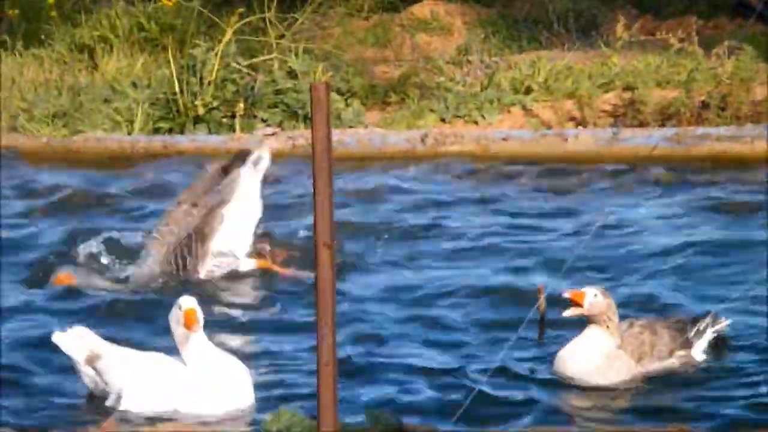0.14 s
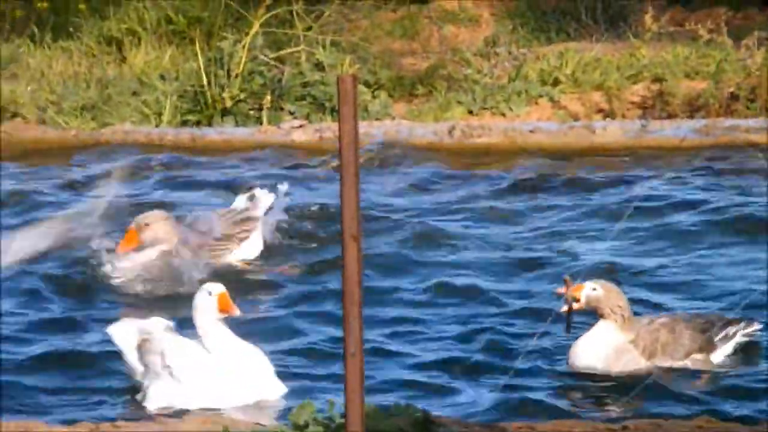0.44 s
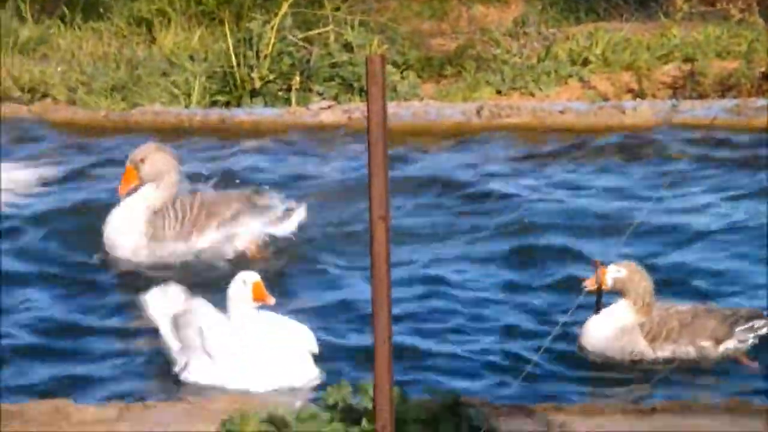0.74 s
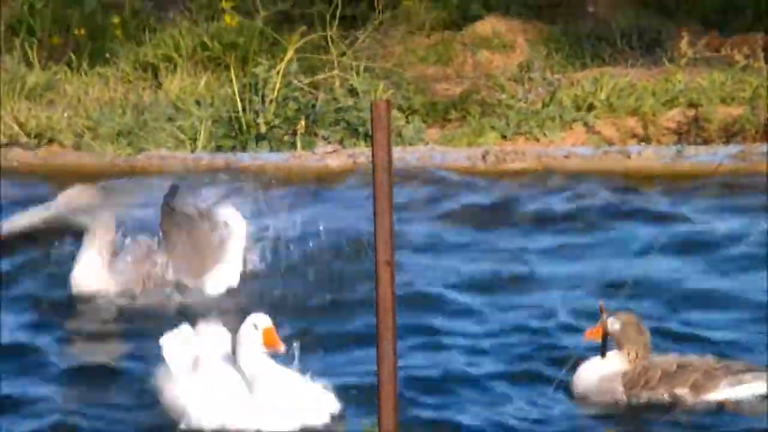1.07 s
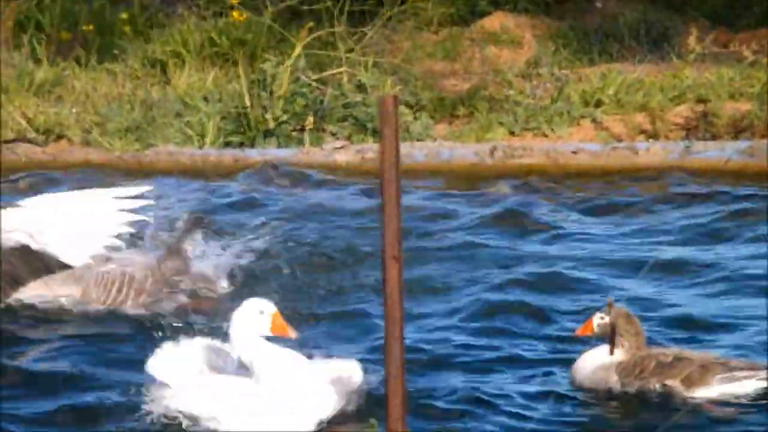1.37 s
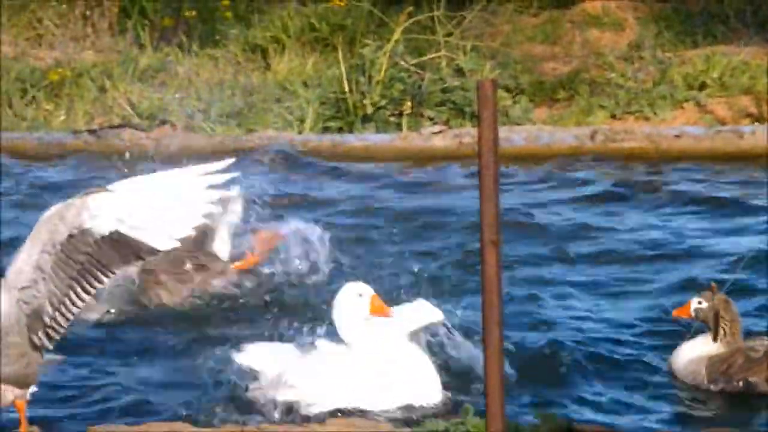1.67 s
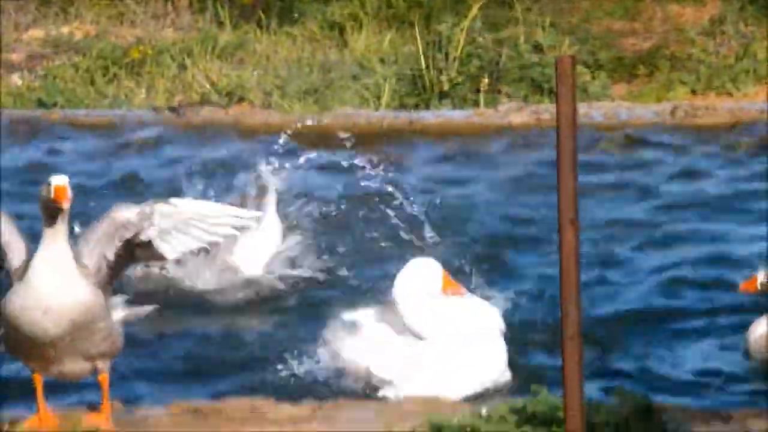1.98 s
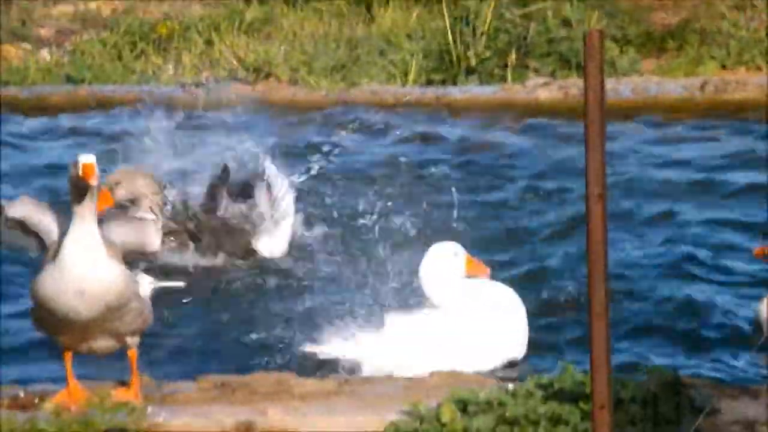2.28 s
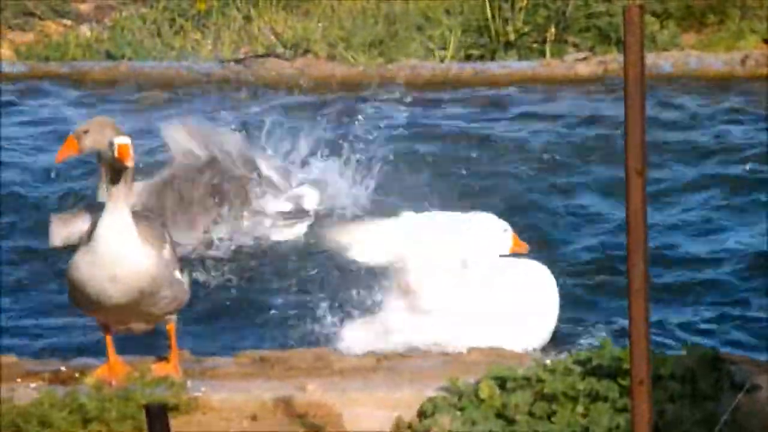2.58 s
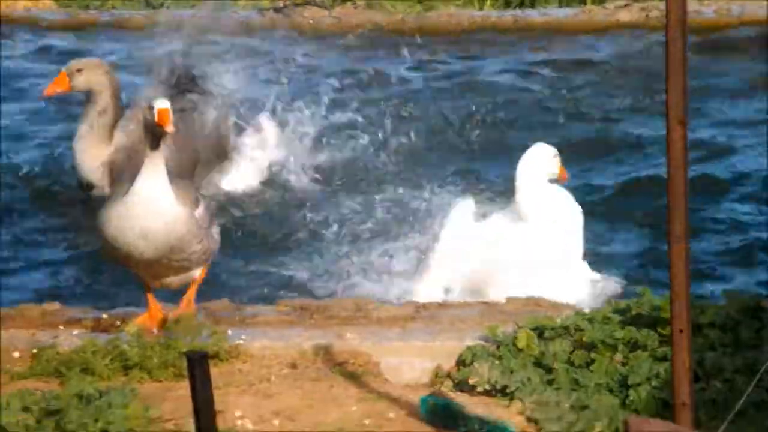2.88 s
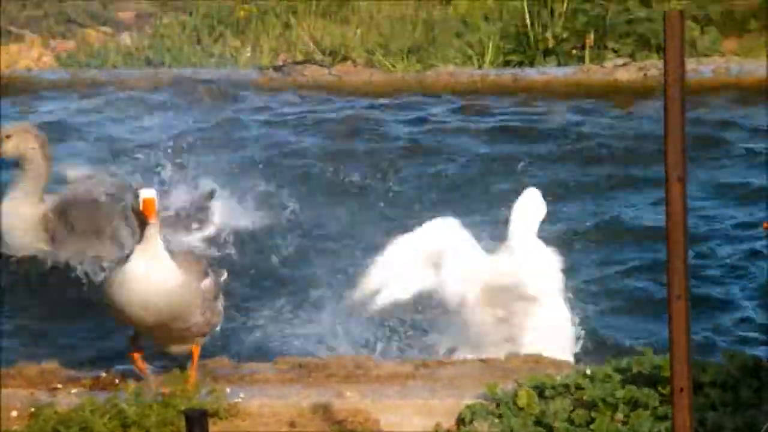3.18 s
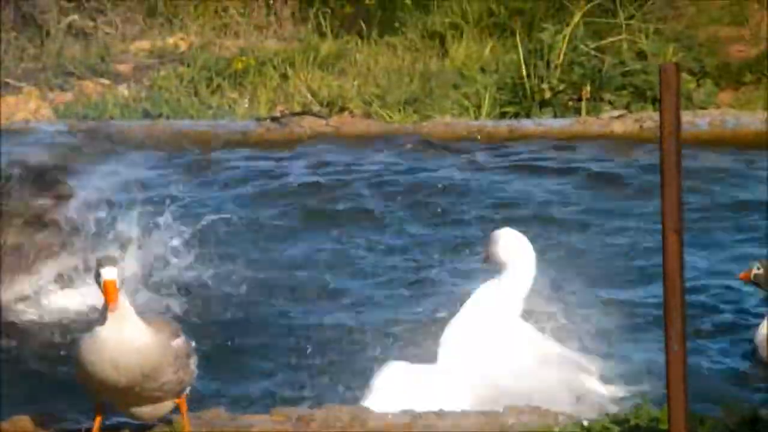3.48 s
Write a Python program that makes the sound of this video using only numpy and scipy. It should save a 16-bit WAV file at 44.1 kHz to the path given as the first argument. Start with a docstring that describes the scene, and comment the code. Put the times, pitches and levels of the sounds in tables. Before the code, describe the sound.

Geese wings slapping and splashing in a pool, sparse at first, then in a fast flurry

```python
"""Churned water washes and patters with a light breeze, under steady hiss and a small motor's faint whine.
Geese bathe in this farm pool some way off: wings slap the water, each slap throwing a burst of spray.
Wash, splash and spray are clumpy filtered noise; bubbles, drops and plips are damped sines rising in pitch.
Smacks are echoed pulses, the whine a few sine lines; the microphone rings near 4 kHz and hisses."""
import sys
import numpy as np
from scipy.fft import rfft, irfft, next_fast_len
from scipy.io import wavfile
from scipy.ndimage import map_coordinates

SR = 44100
rng = np.random.default_rng(int(sys.argv[2]) if len(sys.argv) > 2 else 0)


def generate_wav(signal):
    """Clip the signal to [-1, 1] and save it as 16-bit WAV at the path in sys.argv[1]."""
    frames = np.transpose(np.atleast_2d(signal))
    scaled = np.clip(frames, -1, 1) * 32767
    pcm = np.round(scaled).astype(np.int16)
    wavfile.write(sys.argv[1], SR, pcm)


N = 160083  # samples

# Microphone hiss, centre colour [f/Hz, relative level/dB]
HISS_COLOUR = [(30, -28), (1000, -18), (3000, -4), (6000, 0), (8000, 0), (11000, 0), (15500, -0.5)]
# Width of the hiss, side against centre [f/Hz, level/dB]
HISS_WIDTH = [(100, -21), (1500, -42), (2800, -22.5), (5000, -5), (8000, -6.5), (12000, -7), (16000, -6.5)]
# Motor lines [f/Hz, relative level/dB]
MOTOR_LINES = [(1679, -7.5), (1918, -13), (2139, 1), (2158, -10), (2237, -5.5)]
# Motor fader, shared by all lines [t/s, level/dB]
MOTOR_FADER = [(0, -84), (.11, -66.3), (.62, -66.3), (.74, -71), (.9, -70), (1.15, -74), (1.26, -69),
               (1.34, -73), (1.43, -69), (1.55, -71.5), (1.62, -65), (2.05, -70), (2.3, -70.5), (3.63, -71)]
# Colour of the wash of waves and breeze [f/Hz, relative level/dB]
WASH_COLOUR = [(25, -36), (60, -31), (90, -14), (150, -10.5), (300, -4), (480, -1), (800, -1), (1200, 0.5),
               (1700, 0), (2600, 1), (3500, -2.5), (5000, -6.5), (9000, -23), (16000, -36.5)]
# Wash fader, before the layer trims [t/s, level/dB]
WASH_FADER = [(0.0, -58), (0.41, -57), (0.91, -58), (1.38, -58), (1.74, -57), (2.71, -55), (3.63, -55)]
# Patter fader for drops and fizz, before the layer trims [t/s, level/dB]
PATTER_FADER = [(0.0, -59.5), (0.67, -55.5), (1.09, -57.5), (1.85, -55), (2.4, -51.5), (2.63, -49),
                (2.77, -52.5), (2.87, -49), (2.99, -51), (3.08, -49), (3.39, -53), (3.51, -51),
                (3.63, -55.5)]
# Air pockets trapped by a wing or larger drop: low plops, high plips
# [t/s, starting f/Hz, level before onset/dB, ring time to -60 dB/s]
AIR_POCKETS = [(0.262, 3790, -44, .032), (0.770, 4240, -42.5, 0.03), (1.070, 4650, -41.5, 0.03),
               (1.207, 3750, -43.5, 0.036), (1.317, 4180, -44, .032), (1.532, 720, -53, .05),
               (1.622, 3930, -40, .032), (1.930, 4220, -41, 0.029), (2.2948, 4850, -33, .02),
               (2.2948, 7000, -41, .02), (2.295, 2480, -42, .03), (2.5005, 4180, -26, .03),
               (2.578, 4250, -37, 0.013), (2.716, 4300, -37, 0.0098), (2.8206, 4760, -36, .008),
               (2.8215, 820, -47, 0.031), (2.849, 4400, -36, .01), (2.9118, 3960, -27.5, .024),
               (3.0245, 4220, -34, .04), (3.103, 4150, -39, .016), (3.150, 4250, -35.5, 0.018),
               (3.329, 4080, -38, .02), (3.3535, 4320, -36, .014), (3.540, 4290, -36.5, .028)]
# Wing slaps and soft strokes, levels before the layer trims
# [t/s, smack level/dB, plunge level/dB, splash level/dB, spray level/dB, rise/s, length/s]
WING_SLAPS = [(0.254, -52, -61, -64, -50, .006, .022), (0.445, -54, -55.5, -57, -53, 0.0069, .028),
              (0.633, -58, -50, -55, -59, .008, .028), (1.617, -51, -74, -58, -49, .003, 0.011),
              (1.987, -48, -58, -61, -44, 0.0053, 0.022), (2.11, -39, -69, -66, -45, 0.005, 0.018),
              (2.241, -47, -66, -48.5, -47, .002, 0.013), (2.295, -29, -65, -49, -37.5, .002, .009),
              (2.456, -43, -68, -47, -51, .002, .012), (2.5005, -26, -47, -42.5, -40, .001, .008),
              (2.562, -53, -69, -62, -45.5, 0.009, 0.033), (2.614, -35, -55, -50, -44.5, 0.0094, .026),
              (2.7, -50, -66, -47, -43, 0.0038, 0.012), (2.8195, -43, -52, -48.5, -45, .003, 0.014),
              (2.912, -28, -43.5, -47, -37, .001, .008), (3.023, -39, -55, -46, -38.5, 0.0029, .014),
              (3.111, -35, -51.5, -42, -49, 0.0025, 0.015), (3.225, -42, -50.5, -54, -43, .002, 0.011),
              (3.292, -44, -66, -54, -45.5, 0.0087, 0.03), (3.325, -42, -64, -49.5, -46.5, 0.0043, 0.021),
              (3.439, -38, -55, -50.5, -44, 0.0031, 0.017), (3.532, -46, -42.5, -49, -37, .007, .014)]
# Colour of a wing's first contact [f/Hz, relative level/dB]
SMACK_COLOUR = [(30, -17), (100, -6), (200, -2), (400, -4), (800, 0), (2000, 2), (4200, 9), (6500, 0),
                (10000, -1), (16000, -18)]
# Colour of the low plunge [f/Hz, relative level/dB]
PLUNGE_COLOUR = [(30, -28), (150, -14), (300, -8), (470, -4.5), (620, -6), (850, 2.5), (1300, -5),
                 (2500, -22.5), (6000, -67)]
# Colour of the mid splash [f/Hz, relative level/dB]
SPLASH_COLOUR = [(300, -46), (900, -18), (1600, 2.5), (2600, .5), (3800, -2), (8000, -45)]
# Colour of the bright spray, also used for drops and fizz [f/Hz, relative level/dB]
SPRAY_COLOUR = [(800, -37), (2400, -16), (3800, 2.5), (5200, -1.5), (7000, -4.5), (10000, -4.5),
                (16000, -8.5)]
# Broad microphone colour [f/Hz, level/dB]
MIC_COLOUR = [(20, -4), (3000, 2), (3550, 3.5), (3900, 5), (4250, 8), (4600, 6), (5200, 3), (6000, -0.5),
              (8000, -8.5), (16000, -11)]
# Narrow microphone resonances [f/Hz, width/Hz, level/dB]
MIC_RESONANCES = [(455, 75, 1.5), (582, 110, -3), (796, 35, 3.5), (1230, 140, -1), (1497, 90, 3),
                  (1750, 54, 2.5), (2520, 37, 2.5), (2810, 55, 3), (3150, 50, 4), (3765, 60, 2),
                  (3890, 64, 2.5), (4240, 67, 5), (4480, 58, 3.5), (4886, 65, 5.5)]
# Phase spread between the two ports [f/Hz, right port's lead/rad]
PORT_LEAD = [(20, -0.078), (2000, 0.016), (3000, 0.32), (4300, 0.7), (6400, 0.71), (9000, 1.2),
             (12000, 1.77), (15500, 2.3)]
# Moments when the top narrows to the centre [start t/s, end t/s]
NARROW_SPANS = [(2.31, 2.455), (2.525, 2.575)]

HISS_DB = -55
WASH_DB, BUBBLE_DB, PATTER_DB, FIZZ_DB = .5, -11, -4.5, -3.5  # layer trims
# *_CYCLES: cycles to fall 60 dB
BUBBLES_PER_S, BUBBLE_SPREAD_DB, BUBBLE_HZ, BUBBLE_CYCLES = 260, 1.5, 1291, 21.7
DROPS_PER_S, DROP_SPREAD_DB, DROP_HZ, DROP_CYCLES = 650, 2.5, 3720, 5.4
PLIP_ATTACK_S, PLIP_RISE_PER_S, PLIP_FLUTTER_RAD = .0004, 2, .4  # rise: share of the pitch per second
PLUNGE_DB, SPLASH_DB, SPRAY_DB = -3.5, -2.5, -2.5  # layer trims
TAIL_DB, TAIL_S = -12.5, 0.034  # water falling back
SMACK_DB, SMACK_ECHO_S, SMACK_ECHO_DB = -1, .0048, -11  # trim, then the return from the pool wall
NARROW_ABOVE_HZ, NARROW_FADE_S = 6200, 0.025
TOP_HZ = 15680


def amp(db):
    """Decibels to gain."""
    return 10 ** (np.asarray(db) / 20)


def unit(x):
    """Scaled to rms 1."""
    return x / np.sqrt(np.mean(x ** 2) + 1e-20)


def along(points, hz):
    """Reads (f/Hz, value) points on a log frequency axis."""
    f, v = np.transpose(points)
    return np.interp(np.log(hz + 1), np.log(f + 1), v)


def curve(rows):
    """Draws (t/s, value) points as one value per sample."""
    return np.interp(np.arange(N) / SR, *np.transpose(rows))


def wobble(rate):
    """A smooth random curve with rate knots a second."""
    knots = rng.standard_normal(N // 10)
    return map_coordinates(knots, [np.arange(N) * rate / SR], mode="wrap")


def filtered(x, gain):
    """x through the causal minimum-phase filter with this gain over frequency."""
    m = 2 * next_fast_len(N // 2 + SR // 10)
    log_gain = np.log(np.maximum(gain(np.fft.rfftfreq(m, 1 / SR)), 1e-6))
    # folding the cepstrum forward in time removes any pre-ringing
    cepstrum = irfft(log_gain, m)
    cepstrum[1:m // 2] *= 2
    cepstrum[m // 2 + 1:] = 0
    return irfft(rfft(x, m) * np.exp(rfft(cepstrum)), m)[..., :N]


def heard(x, colour):
    """x shaped by its own colour and by the ringing microphone."""
    def response(hz):
        peaks = sum(db / (1 + (2 * (hz - f) / width) ** 2) for f, width, db in MIC_RESONANCES)
        return amp(along(colour, hz) + along(MIC_COLOUR, hz) + peaks)
    return filtered(x, response)


def water(colour, clump_db, clump_rate):
    """Noise of rms 1 whose level flickers in tiny clumps, like breaking water."""
    noise = rng.standard_normal(N)
    clumps = amp(clump_db * wobble(clump_rate))
    return unit(heard(noise * clumps, colour))


def rings(per_s, spread_db, centre_hz, cycles, octaves, glide):
    """Random damped rings that rise in pitch, most small and a few large."""
    count = int(per_s * N / SR)
    when, size, pitch = rng.random((count, 3)).T
    hz = centre_hz * 2 ** (octaves * (pitch[:, None] - .5))
    t = np.arange(int(2 * cycles / centre_hz * SR)) / SR
    age = hz * t / cycles  # 1 when the ring has fallen 60 dB
    size_db = spread_db * np.minimum(-np.log(1 - size), 4.1)
    tone = np.sin(2 * np.pi * hz * t * (1 + glide * age))
    waves = amp(size_db[:, None]) * tone * np.exp(-np.log(1000) * age)
    index = (when * N).astype(int)[:, None] + np.arange(len(t))
    return np.bincount(index.ravel(), waves.ravel(), N)[:N]


def hiss():
    """Even microphone hiss: shaped noise, opened a little wide by an independent side signal."""
    mid, side = filtered(rng.standard_normal((2, N)), lambda hz: amp(along(HISS_COLOUR, hz)))
    side = filtered(side, lambda hz: amp(along(HISS_WIDTH, hz)))
    return amp(HISS_DB) * unit(np.array([mid + side, mid - side]))


def whine():
    """A small motor's thin sine lines, each slightly unsteady in level and phase."""
    t, lines = np.arange(N) / SR, np.zeros(N)
    for hz, db in MOTOR_LINES:
        level = amp(db + .35 * wobble(11))
        lines += level * np.sin(2 * np.pi * hz * t + 0.14 * wobble(14))
    return np.sqrt(2) * amp(curve(MOTOR_FADER)) * lines


def pool():
    """Churned water: a wash of waves and breeze with ringing bubbles, under pattering drops and fizz."""
    bubbles = rings(BUBBLES_PER_S, BUBBLE_SPREAD_DB, BUBBLE_HZ, BUBBLE_CYCLES, octaves=2.834, glide=0.12)
    bubbles = unit(heard(bubbles, WASH_COLOUR))
    drops = rings(DROPS_PER_S, DROP_SPREAD_DB, DROP_HZ, DROP_CYCLES, octaves=1.37, glide=0.039)
    drops = unit(heard(drops, SPRAY_COLOUR))
    wash = amp(WASH_DB) * water(WASH_COLOUR, clump_db=0.7, clump_rate=270) + amp(BUBBLE_DB) * bubbles
    fizz = water(SPRAY_COLOUR, clump_db=0, clump_rate=500)  # no clumps: even noise
    patter = amp(PATTER_DB) * drops + amp(FIZZ_DB) * fizz
    wash_level = amp(curve(WASH_FADER) + 0.4 * wobble(18))
    patter_level = amp(curve(PATTER_FADER) + 0.74 * wobble(20))
    return wash_level * wash + patter_level * patter


def plips():
    """Trapped air rings as each pocket closes: a short, rough note that rises in pitch."""
    t, out = np.arange(N) / SR, np.zeros(N)
    flutter = PLIP_FLUTTER_RAD * wobble(600)
    for s, hz, db, ring_s in AIR_POCKETS:
        u = np.clip(t - s, 0, 3 * ring_s)
        envelope = amp(db - 60 * u / ring_s) * (1 - np.exp(-u / PLIP_ATTACK_S))
        phase = 2 * np.pi * hz * u * (1 + PLIP_RISE_PER_S * u / 2)
        out += envelope * np.sin(phase + flutter)
    return out


def splashes():
    """Each slap tears the surface: a low plunge, a splash and bright spray, then water falling back."""
    t, levels = np.arange(N) / SR, np.zeros((3, N))
    for s, _, plunge_db, splash_db, spray_db, rise, length in WING_SLAPS:
        start = round(s * SR)
        span = slice(start, start + SR // 5)
        u = t[span] - t[span][0]
        burst = np.exp(-(u / length) ** 2)
        falling_back = amp(TAIL_DB) * np.exp(-u / TAIL_S)
        shape = (1 - np.exp(-u / rise)) * (burst + falling_back)
        levels[:, span] += amp([[plunge_db], [splash_db], [spray_db]]) * shape
    plunge = amp(PLUNGE_DB) * water(PLUNGE_COLOUR, clump_db=3.5, clump_rate=390)
    splash = amp(SPLASH_DB) * water(SPLASH_COLOUR, clump_db=1, clump_rate=1000)
    spray = amp(SPRAY_DB) * water(SPRAY_COLOUR, clump_db=.9, clump_rate=700)
    return np.sum(levels * [plunge, splash, spray], axis=0)


def smacks():
    """A wing's first contact: one sharp pulse, echoed by the pool wall."""
    pulses, click = np.zeros(N), np.zeros(N)
    click[0] = 1
    for s, db, *_ in WING_SLAPS:
        pulses[round(s * SR)] += amp(db)
        pulses[round((s + SMACK_ECHO_S) * SR)] += amp(db + SMACK_ECHO_DB)
    click_peak = np.abs(heard(click, SMACK_COLOUR)).max()
    return amp(SMACK_DB) * heard(pulses, SMACK_COLOUR) / click_peak


def scene():
    """The pool and motor sit dead centre; only the hiss is wide."""
    return smacks() + splashes() + plips() + pool() + whine() + hiss()


def record(dry):
    """Treble leads at the right port, its top narrows briefly twice, and nothing passes the band limit."""
    m, t = next_fast_len(N + SR // 10), np.arange(N) / SR
    hz, spectrum = np.fft.rfftfreq(m, 1 / SR), rfft(dry, m)
    half_lead = .5j * along(PORT_LEAD, hz)
    wide = spectrum * np.exp(half_lead * np.array([[-1], [1]]))
    # the left channel's top, without port phase, feeds both sides
    centred = np.where(hz > NARROW_ABOVE_HZ, spectrum[0], wide)
    share = np.zeros(N)
    for start, end in NARROW_SPANS:
        share += np.clip(np.minimum(t - start, end - t) / NARROW_FADE_S + .5, 0, 1)
    both = (1 - share) * irfft(wide, m)[:, :N] + share * irfft(centred, m)[:, :N]
    return irfft(rfft(both, m) * (hz < TOP_HZ), m)[:, :N]


dry = scene()
out = record(dry)
generate_wav(out)
```